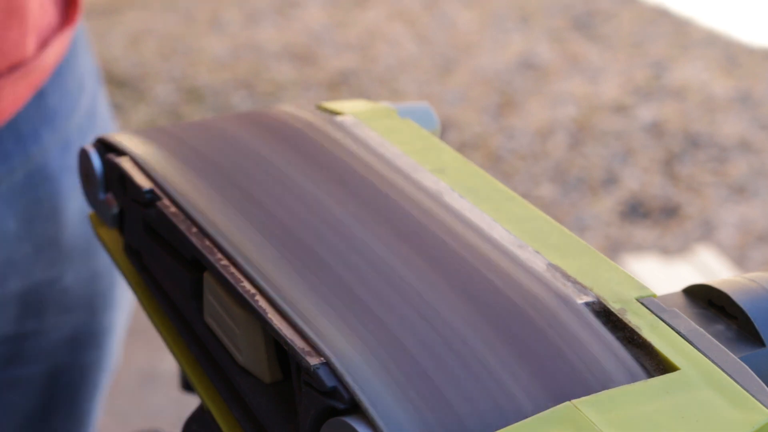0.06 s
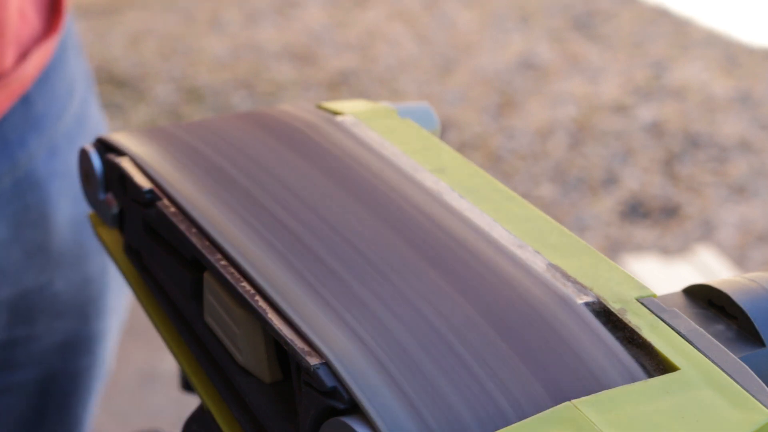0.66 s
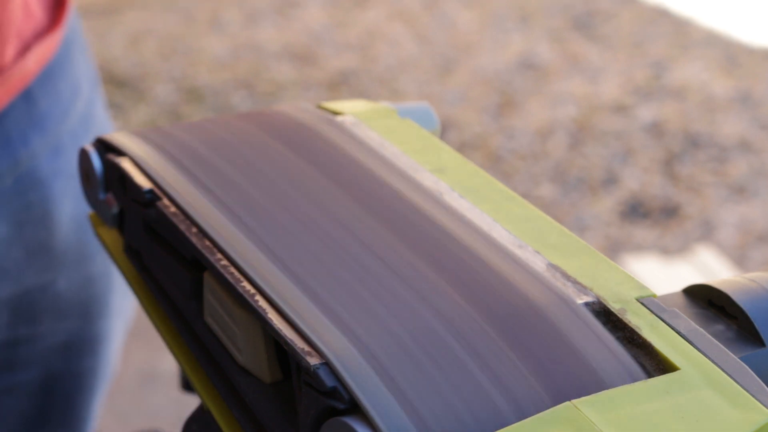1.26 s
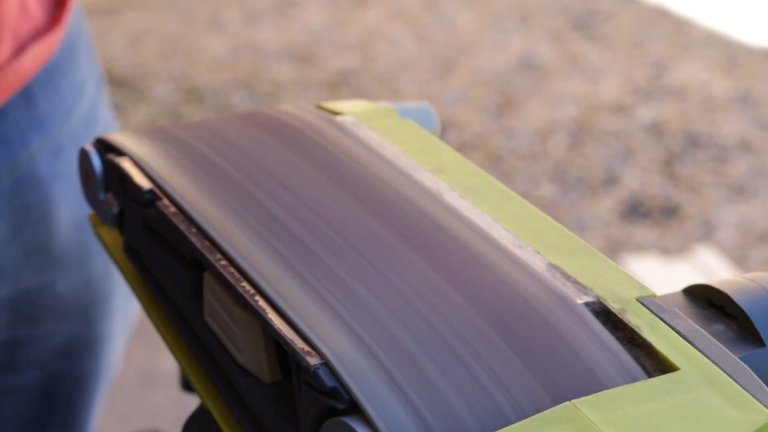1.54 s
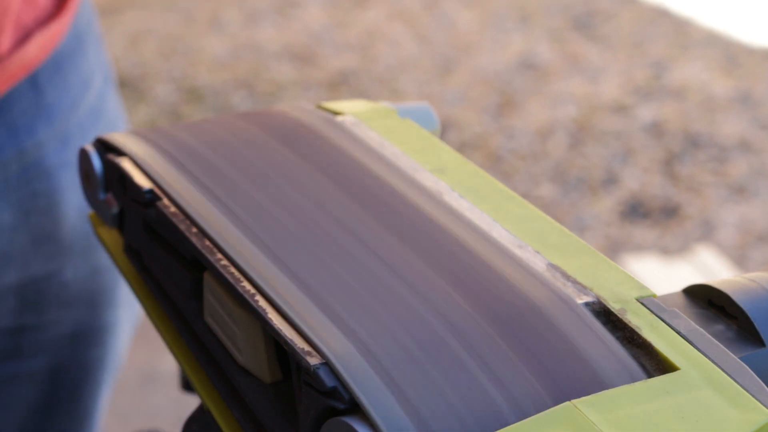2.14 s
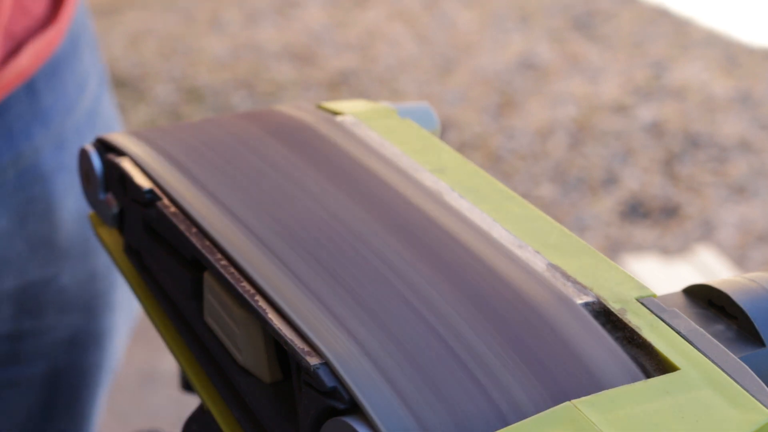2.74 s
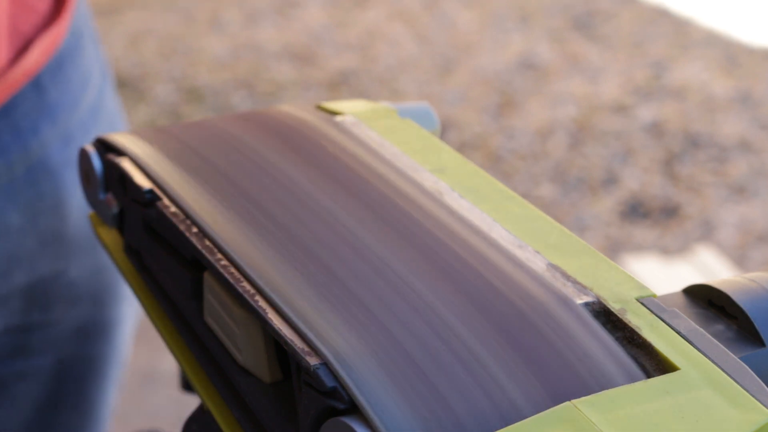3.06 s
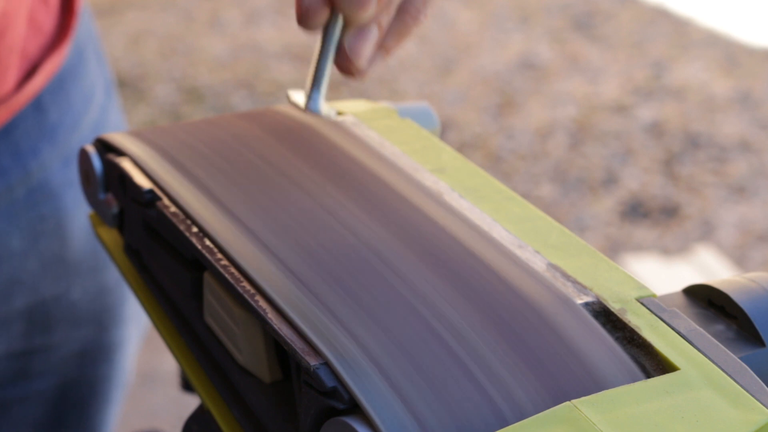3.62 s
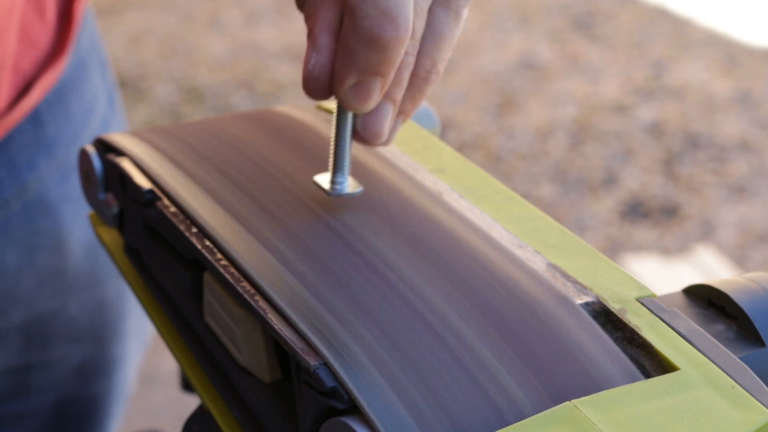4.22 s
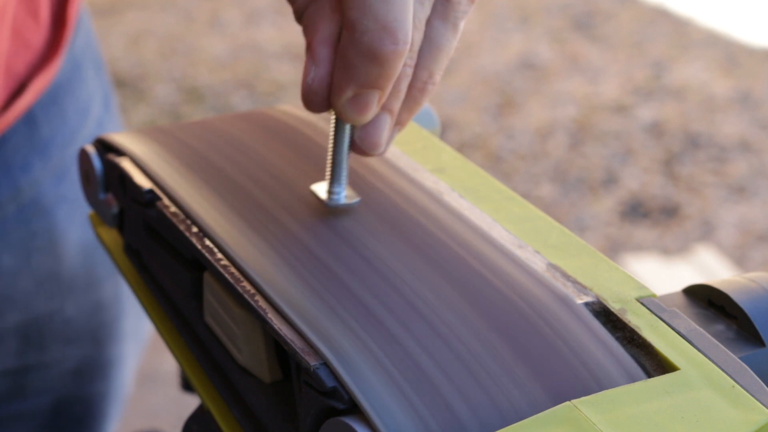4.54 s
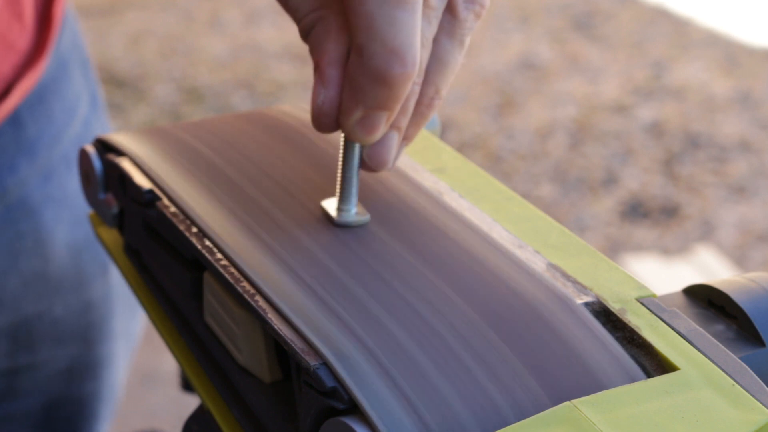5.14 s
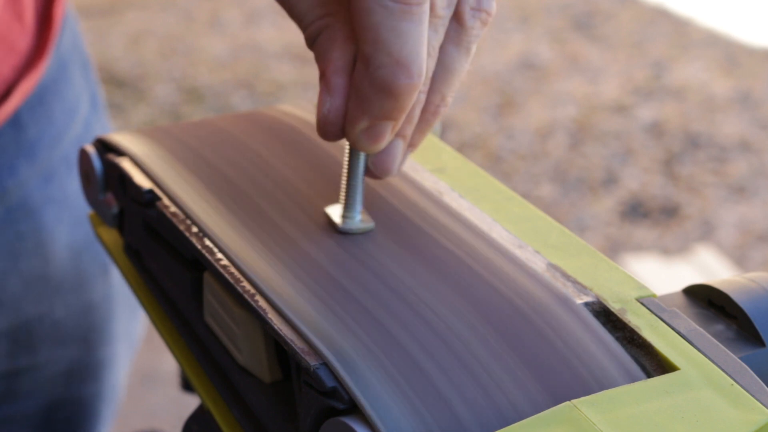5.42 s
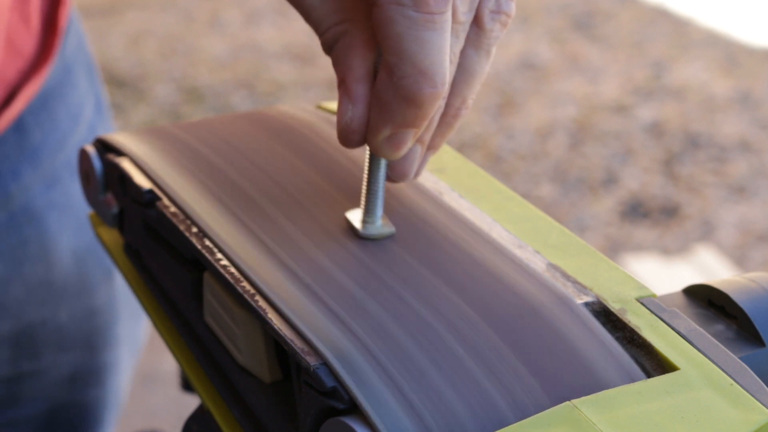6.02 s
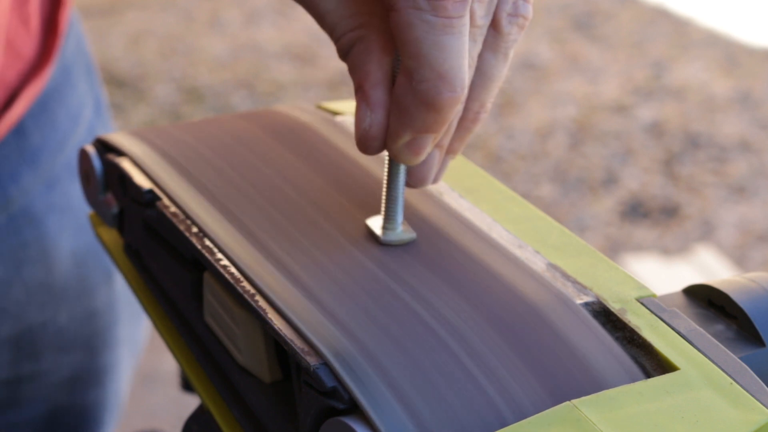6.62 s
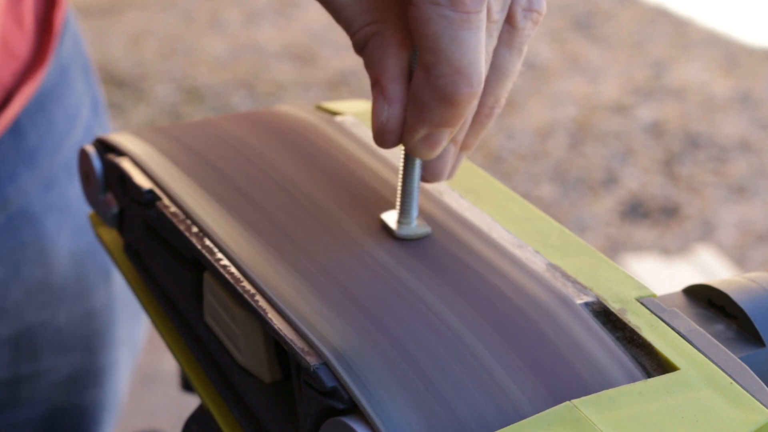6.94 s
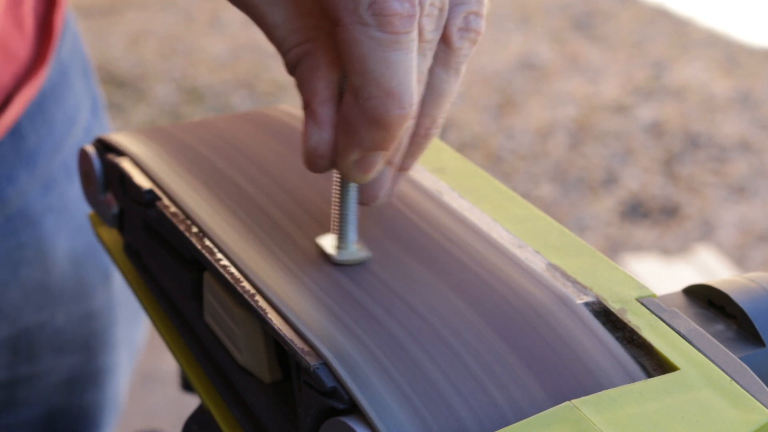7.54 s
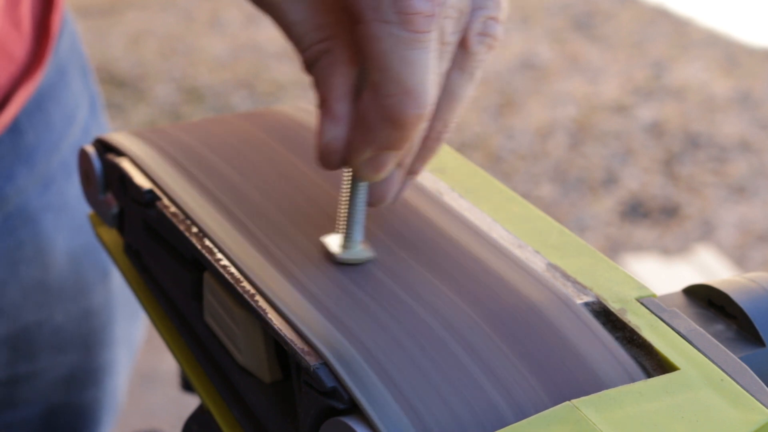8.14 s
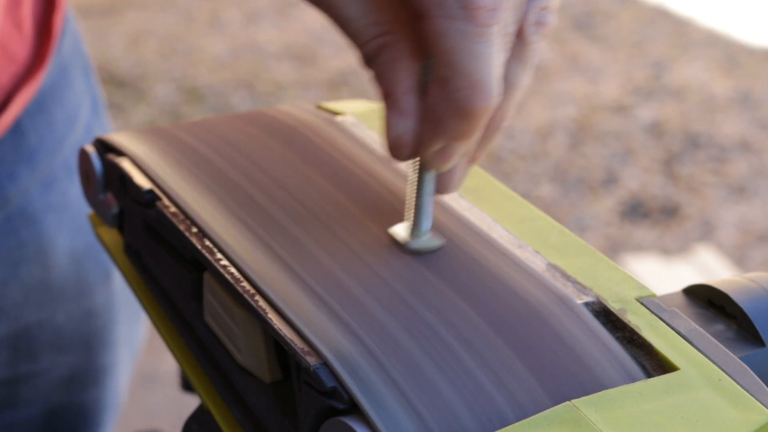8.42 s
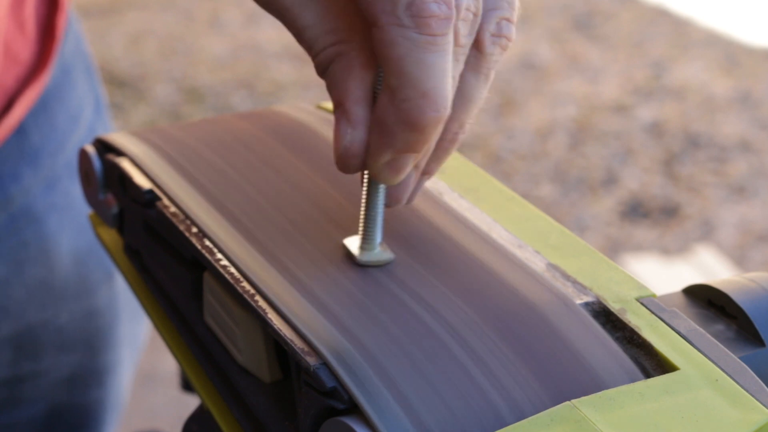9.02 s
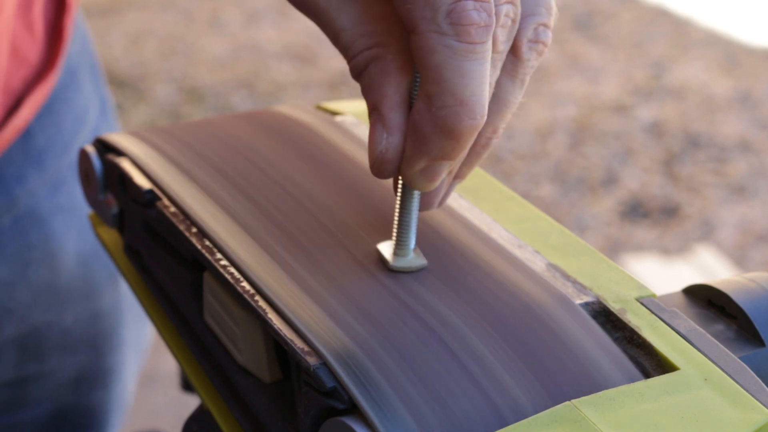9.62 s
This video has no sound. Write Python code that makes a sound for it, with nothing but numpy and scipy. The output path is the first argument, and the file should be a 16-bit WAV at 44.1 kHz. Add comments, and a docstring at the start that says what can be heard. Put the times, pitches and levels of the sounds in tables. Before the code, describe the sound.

An electric belt sander runs outdoors in a yard, its steady high motor whine mixed with throbbing, rattling gears and rushing air. About halfway through, a steel bolt is pressed onto the moving belt. The pitch sags a little and the metal rubs and chatters, with a narrow ringing tone underneath. Just before the end the machine cuts off abruptly, leaving a faint outdoor rumble.

```python
"""In a yard, a hand belt sander lies on its back and runs at about 32000 rpm: motor whine, a toothed drive belt
and a reduction gear sound over rushing cooling air, their periods all set by one shaft. After five seconds a
steel bolt is pressed on the sanding belt; the motor sags a little under the load, the bolt head rubs and
chatters by friction, and a narrow bearing-like tone joins in. Just before the end the scene changes: the
machine's sound stops dead and a quiet outdoor rumble takes its place."""
import sys
import numpy as np
from scipy import signal
from scipy.fft import rfft, irfft, next_fast_len
from scipy.io import wavfile

SR = 44100
rng = np.random.default_rng(int(sys.argv[2]) if len(sys.argv) > 2 else 0)


def master(y):
    """Save y as 16-bit WAV."""
    cut = np.clip(np.atleast_2d(y).T, -1, 1)
    pcm = np.round(cut * 32767)  # scale
    wavfile.write(sys.argv[1], SR, pcm.astype(np.int16))


N = 435266
TIME = np.arange(N) / SR
MAINS_HZ, STOP_S = 50, 9.8095
# turns or laps per turn of the motor shaft
PULLEY_RATIO, DRUM_RATIO = 5 / 12, 5 / 12 * 5 / 33
DRIVE_BELT_RATIO, SANDING_BELT_RATIO = .0211, .019


def undb(db):
    """Amplitude ratio of a level: tenfold for every 20 dB."""
    return 10 ** (np.asarray(db) / 20)


def walk(rate):
    """Random fluctuation: straight lines join standard normal values, rate of them a second."""
    steps = rng.standard_normal(8192)
    return np.interp(TIME * rate, np.arange(len(steps)), steps)


def swing(turns, lead=0.):
    """Simple harmonic motion, one cycle a turn; the phase lead is in turns."""
    return np.cos(2 * np.pi * (turns + lead))


def noise():
    """White noise with unit power per Hz."""
    return rng.standard_normal(N) * np.sqrt(SR / 2)


def shape(x, response):
    """Linear filtering: the spectrum is multiplied by a frequency response."""
    size = next_fast_len(N + 4096)
    hz = np.maximum(np.arange(size // 2 + 1) * SR / size, 1)
    return irfft(rfft(x, size) * response(hz), size)[:N]


def colour(x, points):
    """Spectral envelope: (f/Hz, level/dB) points joined on a logarithmic frequency axis."""
    hz, db = np.transpose(points)
    return shape(x, lambda f: undb(np.interp(np.log(f), np.log(hz), db)))


def ring(x, modes):
    """Resonance: x drives steep (f/Hz, bandwidth/Hz, level/dB) modes whose powers add."""
    def response(f):
        gains = (undb(db) / (1 + ((f * f - hz * hz) / (f * width)) ** 2) for hz, width, db in modes)
        return np.sqrt(sum(gain ** 2 for gain in gains))
    return shape(x, response)


def yard():
    """Ambient noise: a quiet rumble with most of its power at low frequencies."""
    # outdoor spectrum: f/Hz, spectrum level/dB
    spectrum = [(25, -80), (100, -84), (280, -72), (420, -79), (800, -90), (2400, -89), (5000, -99),
                (15000, -102)]
    return colour(noise(), spectrum)


def air(load, drive_laps):
    """Broadband flow noise: cooling air and belt hiss flutter together and pulse with the drive belt."""
    # air and running belt: f/Hz, relative spectrum level/dB
    spectrum = [(25, -109), (60, -104), (150, -91), (260, -81.5), (420, -73.5), (800, -71.5), (1250, -75.5),
                (1900, -74), (3600, -76.5), (4900, -81.5), (7000, -83.5), (9000, -87.5), (10500, -91),
                (15500, -96)]
    flutter_db = .66 * walk(20)
    pulsing = 1 + .048 * swing(2 * drive_laps, lead=-.5)
    return colour(noise() * pulsing, spectrum) * undb(flutter_db - load)


def brushes(load, drive_laps):
    """Spark discharge: the commutator sizzles, in bunches as the drive belt tugs the shaft."""
    # resonances of the sizzle: f/Hz, bandwidth/Hz, relative level/dB
    modes = [(12850, 730, -90.5), (12600, 4500, -94)]
    bunching = 1 + .5 * swing(2 * drive_laps, lead=-.45)
    sparks = noise() * undb(3.1 * walk(700)) * bunching
    return ring(sparks, modes) * undb(-3.5 - 2 * load + .5 * walk(8))


def swell(tone, fade_s=.25):
    """Slow amplitude modulation of a named tone, in dB: each swell or dip fades in, holds and fades out."""
    # swells and dips: start t/s, end t/s, tone, change of level/dB
    swells = [(0, .6, "low whistle", 3), (.85, 3.05, "middle whistle", 7.5), (3.1, 3.7, "low whistle", 3),
              (3.3, 5.7, "high whistle", 7), (3.4, 5.1, "gear whine", -1),
              (4.4, 5.8, "middle whistle", 4.5), (5.2, 6.2, "gear whine", 2.5),
              (8.0, 9.4, "gear whine", 3.5), (9.4, 9.9, "low whistle", 3)]
    return sum(db * np.clip(.5 + np.minimum(TIME - start, end - TIME) / fade_s, 0, 1)
               for start, end, name, db in swells if name == tone)


def rotor(turns, load, mains_ripple):
    """Shaft harmonics: unbalance and fan blades buzz with the mains; three whistles come and go."""
    # rotor and fan tones: shaft order, free level/dB, loaded level/dB
    harmonics = [(1, -49, -47.5), (2, -53.5, -56), (3, -53.5, -57.5), (5, -72, -59), (6, -59, -55.5),
                 (9, -66, -71), (12, -64, -64), (13, -66, -76), (15, -81, -79), (17, -64, -70),
                 (19, -86, -80)]
    # motor whistles: name, shaft order, free level/dB, loaded level/dB
    high_tones = [("low whistle", 11, -60.5, -58), ("middle whistle", 18, -63, -69),
                  ("high whistle", 24, -69, -72)]
    turns = turns + .003 * walk(30)
    hum = whistles = 0
    for order, free, loaded in harmonics:
        db = free + (loaded - free) * load + .37 * walk(25)
        hum += undb(db) * swing(order * turns, lead=rng.random())
    for name, order, free, loaded in high_tones:
        db = free + (loaded - free) * load + swell(name) + 1.4 * walk(4)
        whistles += undb(db) * swing(order * turns)
    buzz = hum * (1 + .5 * swing(mains_ripple))
    return np.sqrt(2) * (buzz + whistles * undb(.8 * walk(25)))


def tug(drive_laps, load):
    """Periodic forcing: the unevenly worn drive belt tugs alike every lap, less so when pulled taut."""
    pattern = (.12 * swing(drive_laps, lead=-.27) + .3 * swing(2 * drive_laps, lead=-.24)
               + .1 * swing(4 * drive_laps) + .2 * swing(8 * drive_laps, lead=.27))
    return pattern * (1 - .78 * load)


def rattle(turns, load, drum, mains_ripple, tugging):
    """Impact excitation: teeth ring the case in bursts, once per pulley turn and drum turn."""
    # gear case resonances: f/Hz, bandwidth/Hz, relative level/dB
    case_modes = [(1990, 370, -71.5), (2327, 470, -66.5), (2470, 34, -67), (2950, 320, -71.5),
                  (3554, 210, -74), (4314, 290, -71.5), (4472, 230, -75.5), (5270, 140, -77)]
    bursts = (1 + .17 * swing(drum, lead=-.17) + .4 * swing(turns * PULLEY_RATIO)
              + .083 * swing(mains_ripple) + .28 * tugging)
    db = -1.5 - 2.7 * load + .25 * walk(25)  # load takes up the slack
    return ring(noise() * bursts, case_modes) * undb(db)


def gears(turns, load, drum, mains_ripple, tugging, whine_order=15):
    """Modulated mesh tones: the off-centre drum gear and the mains ripple make them throb and waver."""
    # pulley and pinion tones: pulley order, free and loaded relative level/dB, throb depth, lag/drum turns
    mesh_tones = [(1, -78.5, -82, 0, 0), (5, -64.5, -65, 0.4, 0.34), (9, -56, -47, 0.1, 0.2),
                  (10, -43, -40, 0.3, 0.32), (11, -54.5, -56, 0.2, 0.34), (13, -64, -56, .3, 0.064),
                  (15, -51.5, -49.5, 0.62, 0.41), (16, -58, -65, 0.2, 0.46), (19, -59, -62, .4, 0.47),
                  (20, -50, -49, 0.7, 0.0037)]
    waver = .0066 * swing(drum, lead=.45) + .0011 * swing(mains_ripple, lead=-.11) + .0007 * walk(150)
    pulley = turns * PULLEY_RATIO + waver
    force = 1 + .26 * swing(mains_ripple) + .79 * tugging
    tones = 0
    for order, free, loaded, depth, lag in mesh_tones:
        db = free + (loaded - free) * load + .88 * walk(120)
        if order == whine_order:
            db += swell("gear whine")
        # load presses the teeth together: the throb comes later and shallower
        throb = 1 + depth * (1 - .29 * load) * swing(drum, lead=-lag - .13 * load)
        tones += undb(db) * throb * swing(order * pulley, lead=rng.random())
    return np.sqrt(2) * undb(.5) * force * tones


def bolt(load, laps, splice_s=5.615):
    """Sliding friction: the bolt head rubs, rasps on the belt's splice and catches at times."""
    # resonances heard under load: the plate's rub near 615 and 717 Hz, and a narrow bearing-like
    # tone near 673 Hz: f/Hz, bandwidth/Hz, relative level/dB
    load_modes = [(615, 77, -70.5), (673, 24, -66.5), (717, 60, -78)]
    # the bolt head catches: t/s, relative level/dB
    catches = [(5.611, 0), (5.695, 0), (5.805, 3), (6.0, 1), (6.09, 2), (6.18, 1), (6.405, 1), (6.505, -1),
               (7.378, 4.5), (7.969, -1)]
    # a knock shakes the whole plate, so it is broader than the rub: f/Hz, relative spectrum level/dB
    rasp_spectrum = [(60, -130), (450, -92), (660, -67), (780, -70), (900, -69), (1200, -84), (4000, -90),
                     (15000, -112)]
    # the splice passes under the bolt once a lap, one such pass at splice_s
    from_splice = (laps - np.interp(splice_s, TIME, laps) + .5) % 1 - .5
    judder = undb(-4 + 1.4 * walk(8)) * load * np.exp(-(from_splice / .15) ** 2)
    for start, db in catches:
        age = np.maximum(TIME - start, 0) / .010  # each catch peaks after 10 ms
        judder += undb(db) * age * np.exp(1 - age)
    grit = noise() * undb(1.7 * walk(500))
    thickness = 1 + .29 * swing(from_splice)  # the belt is thicker near the splice
    rub_and_tone = ring(grit * load * thickness, load_modes) * undb(3)
    rasp = colour(noise() * judder, rasp_spectrum)
    scrape = colour(grit, [(60, -130), (300, -110), (900, -83), (1500, -83),
                           (3200, -98), (6000, -102), (15000, -110)])
    return rub_and_tone + rasp + scrape * load


def shaft_speed(load, free_hz=536.55, creep_hz_per_s=.865, sag_hz=12.3, inertia_s=.3):
    """Rotational inertia: the motor's speed, creeping upward, sags under load with a first-order lag."""
    step = 1 / (inertia_s * SR)
    drag = signal.lfilter([step], [1, step - 1], load)
    return free_hz + creep_hz_per_s * TIME - sag_hz * drag


def scene():
    """Superposition: the parts driven by one shaft add up; at STOP_S the scene changes to the quiet yard."""
    # how hard the bolt bears on the belt: t/s, pressure (0-1)
    pressure = [(4.75, 0), (5.45, .33), (6.1, .79), (7, .75), (8.9, .79), (9.5, 1)]
    load = np.interp(TIME, *np.transpose(pressure))
    turns = np.cumsum(shaft_speed(load)) / SR
    drum, drive_laps = turns * DRUM_RATIO, turns * DRIVE_BELT_RATIO
    mains_ripple = 2 * MAINS_HZ * TIME  # phase in cycles: the motor pulls twice per mains cycle
    tugging = tug(drive_laps, load)
    machine = rotor(turns, load, mains_ripple) + brushes(load, drive_laps) + air(load, drive_laps)
    machine += gears(turns, load, drum, mains_ripple, tugging)
    machine += rattle(turns, load, drum, mains_ripple, tugging)
    machine += bolt(load, turns * SANDING_BELT_RATIO)
    return np.where(TIME < STOP_S, machine, yard())[None]


def record(dry):
    """Band limiting: a steep elliptic low-pass removes the treble above 15750 Hz."""
    return signal.sosfilt(signal.ellip(12, .1, 70, 15750, fs=SR, output="sos"), dry)


dry = scene()
out = record(dry)
master(out)
```